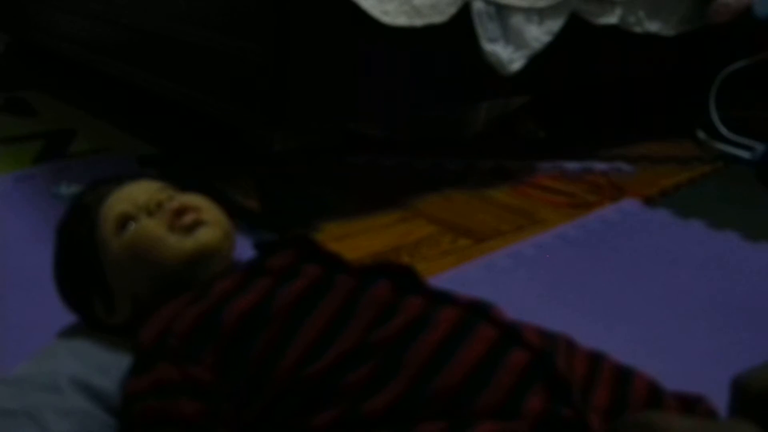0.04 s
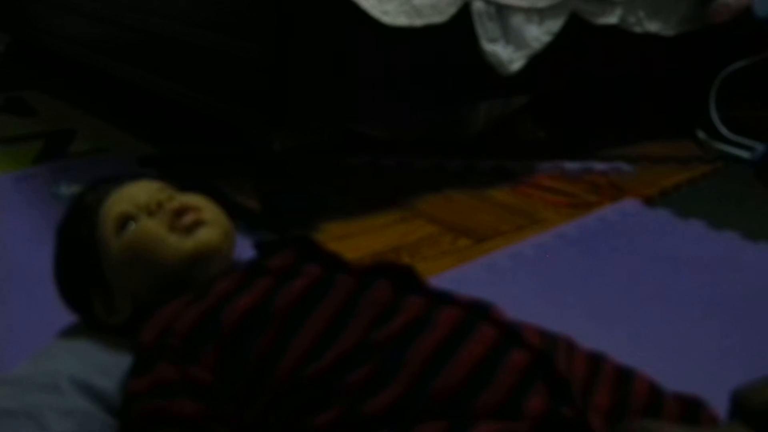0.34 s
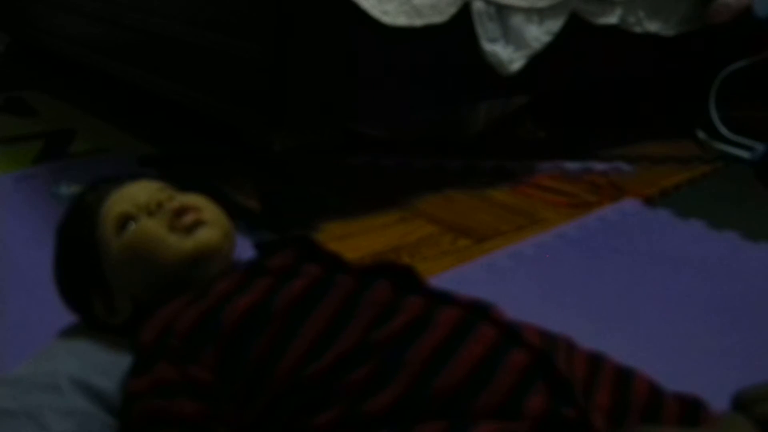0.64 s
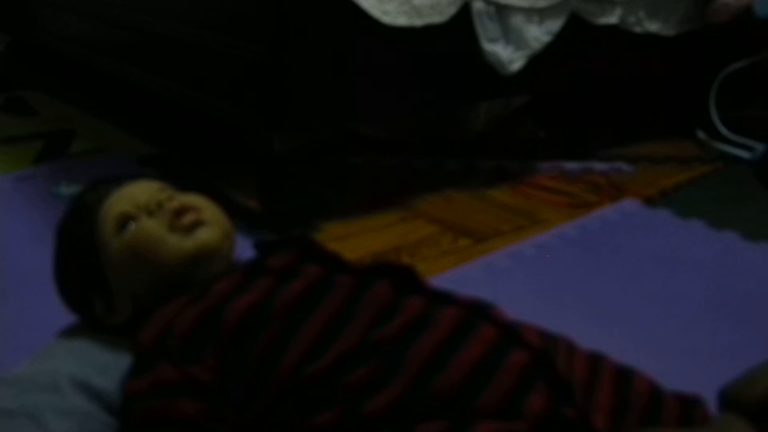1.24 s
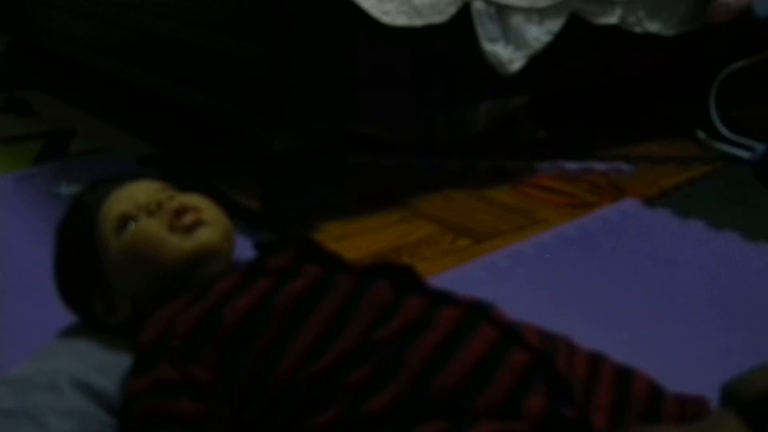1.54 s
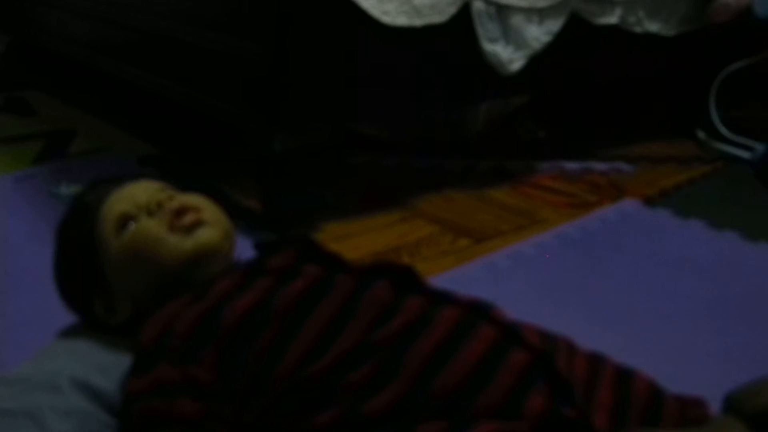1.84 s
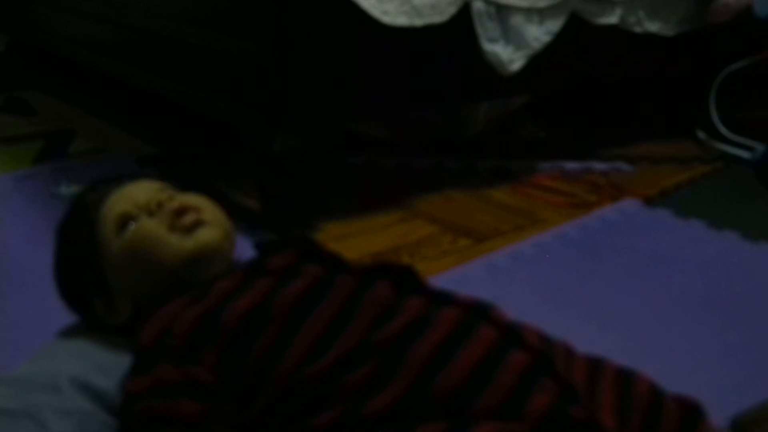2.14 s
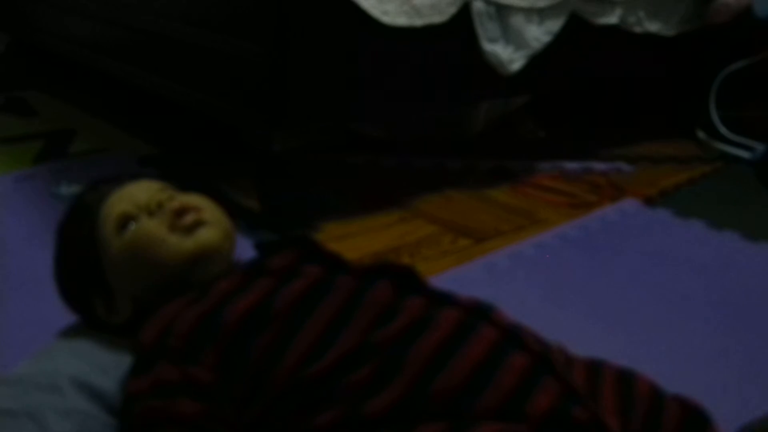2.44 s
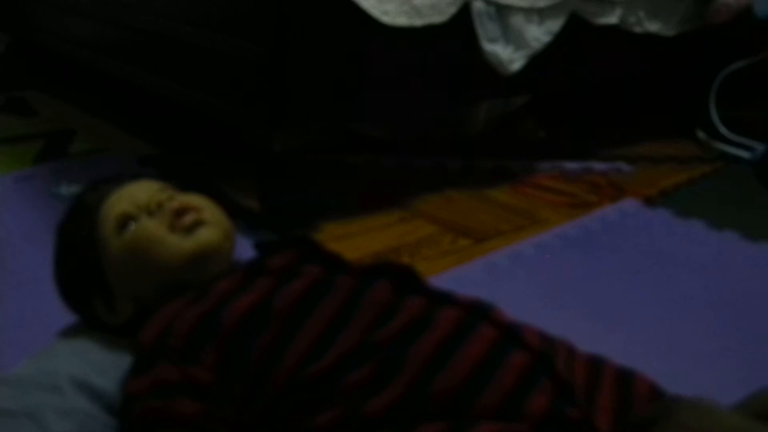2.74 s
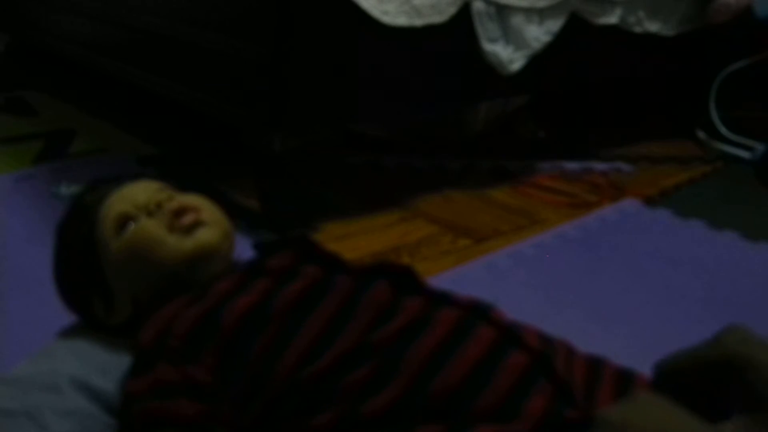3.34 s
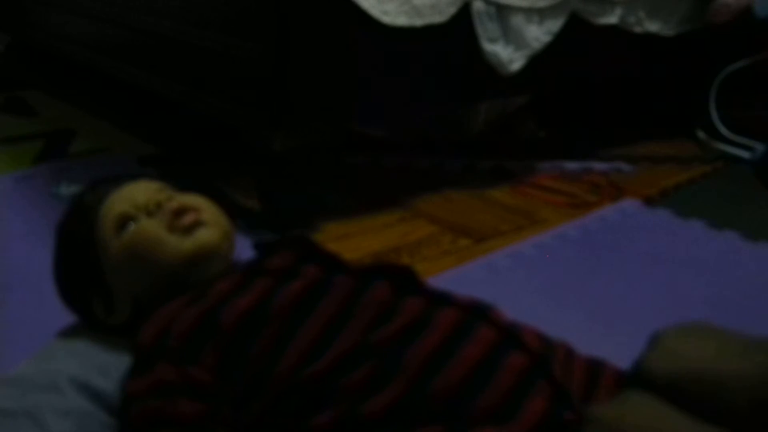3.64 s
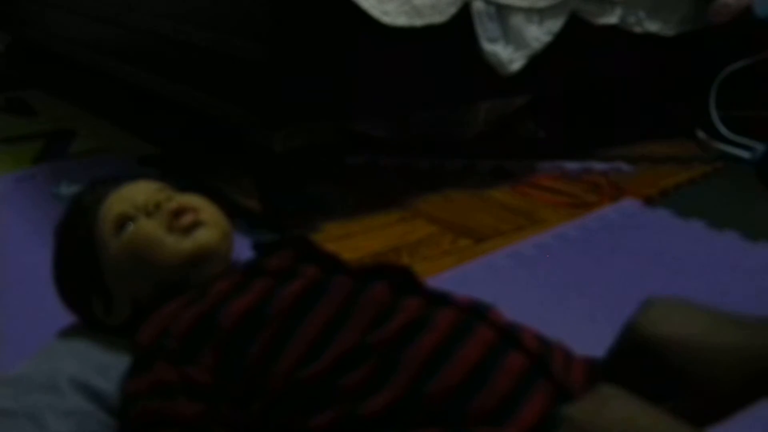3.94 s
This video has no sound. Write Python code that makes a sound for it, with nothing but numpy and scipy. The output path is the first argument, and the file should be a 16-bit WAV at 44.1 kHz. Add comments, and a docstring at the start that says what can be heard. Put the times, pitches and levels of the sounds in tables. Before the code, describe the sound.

Soft, even pats of a hand on a hollow doll in a quiet room.

```python
"""A small quiet room: a hand pats a hollow doll on a floor mat, about four times a second from 2 s on.
Each pat rings the doll's damped resonances and comes back off the floor and walls.
A sharp click and a faint one fall between pats; hand and cloth brush softly.
Underneath are mains hum, faint steady tones, a low rumble, a soft room rush and microphone hiss."""
import sys
import numpy as np
from scipy import signal
from scipy.fft import rfft, irfft
from scipy.io import wavfile

SR = 44100
rng = np.random.default_rng(int(sys.argv[2]) if len(sys.argv) > 2 else 0)


def store_pcm(level_fs):
    """Save levels as 16-bit WAV."""
    pcm = np.round(np.clip(level_fs, -1, 1) * 32767).astype(np.int16)
    wavfile.write(sys.argv[1], SR, np.atleast_2d(pcm).T)


N = 176400


def pats():
    """Soft blows ring the hollow body; neighbouring resonances swing in opposite directions."""
    # doll resonances, low to high: freq_hz, t60_s
    modes = [(642, 0.029), (900, 0.032), (1330, 0.014), (1660, 0.0054), (2520, 0.015)]
    # pats, each on its own spot: start_s, lowest_mode_pitch_ratio, then level_db per resonance
    blows = [(2.0810, 1.035, -24, -20.5, -33.5, -35, -42.5), (2.3348, 1.034, -21.5, -19.5, -34.5, -48, -51),
             (2.5671, .99, -20.5, -28.5, -33, -31, -40), (2.8002, 0.977, -23, -30.5, -34, -32.5, -45),
             (3.0300, 0.97, -18, -23, -35, -32, -46.5), (3.2632, .98, -20.5, -23, -32, -34, -40.5),
             (3.495, 0.985, -20.5, -22.5, -32.5, -44, -45.5), (3.7133, 0.98, -21, -25.5, -60, -43, -46.5),
             (3.9438, 0.9, -26.5, -26.5, -30, -35, -43.5)]
    # standing waves of the room: freq_hz, gain_db, t60_s
    room_modes = [(460, -22, 0.36), (578.5, -24, 0.2), (628, -26, 0.44), (702, -40, 0.28),
                  (1383, -26, 0.28)]
    # floor and wall reflections: delay_s, signed_gain
    echoes = [(.00313, 1.39), (.01084, -0.82), (.01496, -0.88), (.01865, 0.55), (.02555, 0.37),
              (.02767, -0.57), (.03017, -.26), (.0345, 0.52), (.03829, 0.33)]
    finger_spread_s, finger_db = 0.0049, -5.5
    body = 0
    for start_s, pitch_ratio, *levels_db in blows:
        blow = impulses([start_s], 0.98)
        # other fingers land around the blow and stir the upper resonances
        finger_times_s = start_s + finger_spread_s * (rng.random(size=3) - 0.5)
        fingers = blow + impulses(finger_times_s, from_db(finger_db))
        for k, ((hz, t60_s), db) in enumerate(zip(modes, levels_db)):
            mode = ring(blow if k < 2 else fingers, hz * pitch_ratio if k == 0 else hz, t60_s)
            body = body + (-1) ** k * from_db(db) * mode
    body = filtered(body, 483, "high", order=3)
    body = filtered(body, 8100, "low")
    standing = sum(ring(body * from_db(db) * hz / SR, hz, t60_s) for hz, db, t60_s in room_modes)
    return panned(room(body + standing, echoes, tail_db=-2.5, onset_s=0.025), pan_db=-3)


def clicks():
    """Hard contacts: a short bright ring, and a brief crack that splashes into the room."""
    # contacts: start_s, level_db
    contacts = [(2.4927, -19.5), (2.784, -40)]
    # contact resonances: freq_hz, level_db, t60_s
    modes = [(1380, -2.5, .014), (1837, -3, 0.02), (2333, 0, 0.0097), (3340, -5, 0.0073),
             (5740, -18, 0.0079)]
    # early reflections of the ring: delay_s, signed_gain
    ring_echoes = [(0.0134, 0.19), (.0213, 0.15), (.0228, -.14), (.0252, 0.2)]
    # the same first two reflections, heard brighter in the crack: delay_s, gain
    crack_echoes = [(.0133, .6), (.0213, .2)]
    crack_db, crack_t60_s, onset_s = -15, 0.015, 0.0091
    starts_s, levels_db = np.transpose(contacts)
    hits = impulses(starts_s, from_db(levels_db))
    t = np.arange(SR // 10) / SR
    burst = rng.standard_normal(len(t)) * from_db(crack_db - 60 * t / crack_t60_s)
    crack = filtered(signal.fftconvolve(hits, burst)[:N], 5800, "low", order=1)
    rings = sum((-1) ** k * ring(hits * from_db(db), hz, t60_s)
                for k, (hz, db, t60_s) in enumerate(modes))
    rings = filtered(rings, [280, 9000], "band", order=1)
    rings = room(rings, ring_echoes, tail_db=-5.5, onset_s=onset_s)
    crack = room(crack, crack_echoes, tail_db=4, onset_s=onset_s)
    return panned(rings + crack, pan_db=-3)


def brushes():
    """Faint swells of rubbing noise as the hand shifts on the cloth."""
    # rubs: centre_s, half_width_s, low_hz, high_hz, level_db
    rubs = [(.47, 0.077, 1300, 3460, -56), (3.223, .045, 220, 290, -46), (3.374, 0.08, 3500, 8500, -65),
            (3.933, 0.037, 204, 310, -52)]
    t, out = np.arange(N) / SR, 0
    for centre_s, half_width_s, low_hz, high_hz, db in rubs:
        rub = rms_one(filtered(rng.standard_normal(N), [low_hz, high_hz], "band"))
        out = out + from_db(db) * rub * np.exp(-((t - centre_s) / half_width_s) ** 2)
    return panned(out, pan_db=-7.5)


def room(x, echoes, tail_db, onset_s):
    """Direct sound, distinct reflections, and a diffuse tail that swells and dies band by band."""
    # reverberation time: freq_hz, t60_s
    decay_times = [(300, 0.14), (650, 0.32), (1300, 0.59), (3000, 0.48), (12000, 0.092)]
    # left-right likeness of the tail: freq_hz, correlation
    likeness = [(600, 0.92), (1000, 0.97), (2000, 0.98), (5000, .2)]
    t, hz = np.arange(SR) / SR, np.fft.rfftfreq(SR, 1 / SR)
    spectra, tail = stereo_spectra(at_hz(likeness, hz), size=SR), 0
    swell = np.clip(t / onset_s - 0.5, 0, 1)
    edges_hz = np.geomspace(100, 16000, 15)
    for low, high in zip(edges_hz, edges_hz[1:]):
        decay = from_db(-60 * t / at_hz(decay_times, np.sqrt(low * high)))
        band = irfft(spectra * ((hz >= low) & (hz < high)), SR) * decay * swell
        energy = np.mean(np.sum(band ** 2, axis=1))
        tail = tail + band * np.sqrt((high - low) / (SR / 2) / energy)
    delays_s, gains = np.transpose([(0, 1)] + list(echoes))
    response = impulses(delays_s, gains)[:SR] + from_db(tail_db) * tail
    return signal.fftconvolve(x[None], response, axes=1)[:, :N]


def steady_tones(tones):
    """Mains hum, two faint ringing resonances and a thin high whine, wavering in level and phase."""
    t, out = np.arange(N) / SR, 0
    waver = 0.2
    for hz, db, pan_db in tones:
        amplitude = from_db(db) * np.sqrt(2) * (1 + waver * drift(rate_hz=1.4))
        phase = 2 * np.pi * hz * t + waver * drift(rate_hz=6)
        out = out + panned(amplitude * np.sin(phase), pan_db)
    return out


def rumble():
    """A narrow band of low noise that throbs beside the hum and sinks as the patting starts."""
    # rumble envelope: time_s, level_db
    envelope = [(0, -51), (1.8, -51.5), (2.4, -55), (4, -58)]
    white = irfft(stereo_spectra(correlation=0.78, size=N), N)
    band = rms_one(filtered(white, [103.5, 141], "band"))
    level_db = np.interp(np.arange(N) / SR, *np.transpose(envelope))
    return panned(band * from_db(level_db), pan_db=-5)


def air(mains_lines):
    """Steady room rush and hiss, wider in the treble, notched at the given mains lines."""
    # noise spectrum: freq_hz, relative_density_db
    density = [(25, -22), (43, -4.5), (64, -6.5), (86, -14.5), (120, -12), (156, -13.5), (281, -11.5),
               (389, -18.5), (482, -17), (530, -11), (600, -11.5), (684, -11), (741, -15.5), (804, -12),
               (1140, -18.5), (2060, -19), (3000, -22.5), (4300, -30.5), (5400, -29.5), (7100, -32.5),
               (10300, -32.5), (10900, -31), (11600, -35.5), (12400, -32.5), (13400, -28), (14400, -32),
               (15500, -38.5)]
    # left-right likeness: freq_hz, correlation
    likeness = [(40, 0.83), (130, 0.61), (300, 0.68), (650, 0.94), (1200, 0.46), (2500, 0.32),
                (5000, 0.069), (14000, 0.28)]
    # stereo balance: freq_hz, left_minus_right_db
    balance = [(60, -6.5), (150, -2.5), (380, -2), (950, -1.5), (2380, -0.5), (5980, -0.5), (15000, -2.0)]
    rms_db, low_cut_hz, notch_db, notch_half_width_hz = -46, 41, -8, 7
    hz = np.fft.rfftfreq(N, 1 / SR)
    notches = sum(np.exp(-((hz - line[0]) / notch_half_width_hz) ** 2) for line in mains_lines)
    low_cut = hz ** 2 / (hz ** 2 + low_cut_hz ** 2)
    colour = from_db(at_hz(density, hz) + notch_db * notches) * low_cut
    spectra = stereo_spectra(at_hz(likeness, hz), size=N) * panned(colour, at_hz(balance, hz))
    return from_db(rms_db) * rms_one(irfft(spectra, N))


def from_db(db):
    return 10 ** (np.asarray(db) / 20)


def rms_one(x):
    return x / np.sqrt(np.mean(x ** 2) + 1e-20)


def at_hz(points, hz):
    """Read a table on a log-frequency axis."""
    freqs_hz, values = np.transpose(points)
    return np.interp(np.log(hz + 1e-9), np.log(freqs_hz), values)


def panned(x, pan_db):
    """Stereo pair; pan_db is left minus right."""
    return x * np.vstack([from_db(pan_db / 2), from_db(-pan_db / 2)])


def filtered(x, hz, kind, order=2):
    """Butterworth filter."""
    return signal.sosfilt(signal.butter(order, hz, kind, fs=SR, output="sos"), x)


def drift(rate_hz):
    """Slow random wander, rms 1."""
    hz = np.fft.rfftfreq(N, 1 / SR)
    return rms_one(irfft(rfft(rng.standard_normal(N)) / (1 + (hz / rate_hz) ** 2), N))


def impulses(times_s, sizes):
    """One impulse of the given size at each time."""
    out = np.zeros(N)
    np.add.at(out, np.round(np.asarray(times_s) * SR).astype(int), sizes)
    return out


def ring(drive, hz, t60_s):
    """Resonator: a unit impulse starts a decaying sine of height 1."""
    radius, angle = from_db(-60 / (t60_s * SR)), 2 * np.pi * hz / SR
    return signal.lfilter([0, np.sin(angle)], [1, -2 * radius * np.cos(angle), radius ** 2], drive + 1e-18)


def stereo_spectra(correlation, size):
    """Spectra of two correlated white noises."""
    mid, side = rfft(rng.standard_normal((2, size)))
    side = side * np.array([[1], [-1]])
    return (np.sqrt(1 + correlation) * mid + np.sqrt(1 - correlation) * side) / np.sqrt(2)


def scene():
    """Pats and clicks over the room's background."""
    # steady tones (three mains lines, two resonances, a high whine): freq_hz, rms_db, pan_db
    tones = [(58.3, -57, -8), (119.1, -57, -2.5), (239.6, -67, -4), (524.6, -64, -10.5), (791.3, -61, -4),
             (15735, -86, 10)]
    return pats() + clicks() + brushes() + steady_tones(tones) + rumble() + air(tones[:2])


def record(dry):
    """Steep elliptic low-pass."""
    cutoff_hz = 15800
    return signal.sosfilt(signal.ellip(12, .1, 80, cutoff_hz, fs=SR, output="sos"), dry)


dry = scene()
out = record(dry)
store_pcm(out)
```